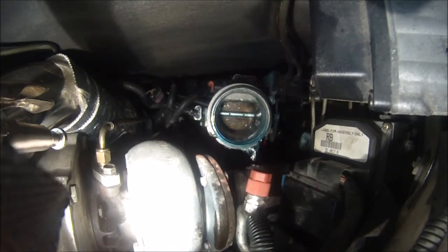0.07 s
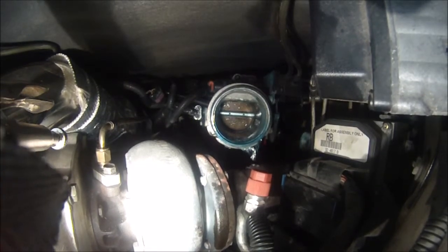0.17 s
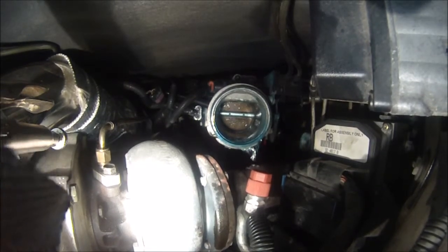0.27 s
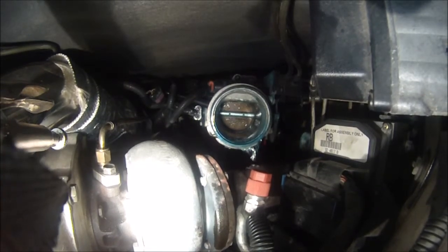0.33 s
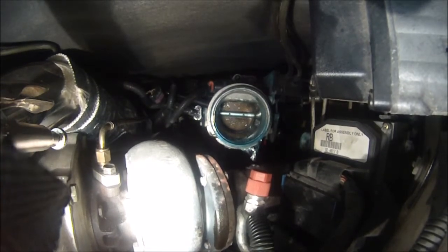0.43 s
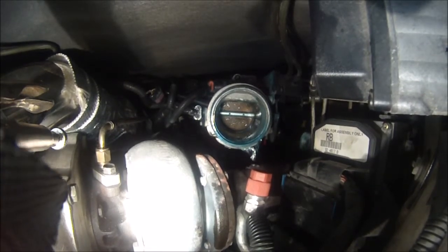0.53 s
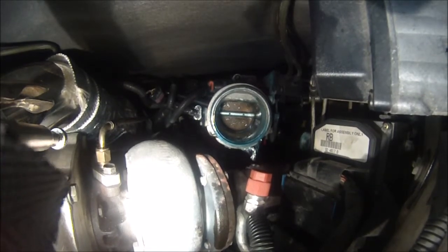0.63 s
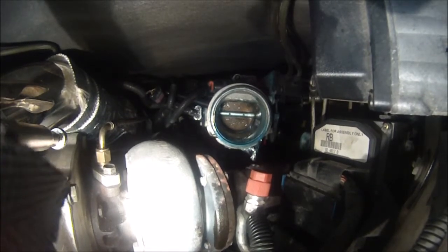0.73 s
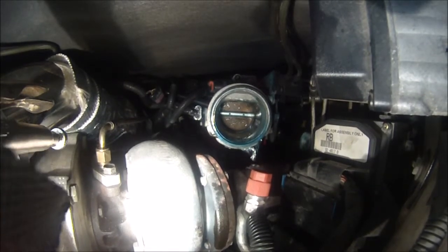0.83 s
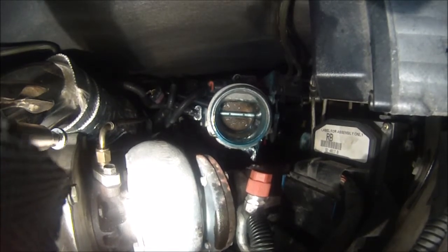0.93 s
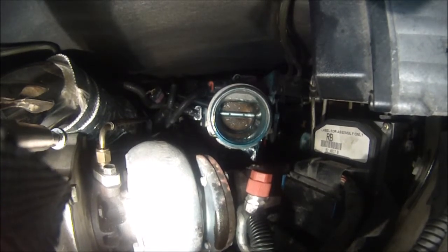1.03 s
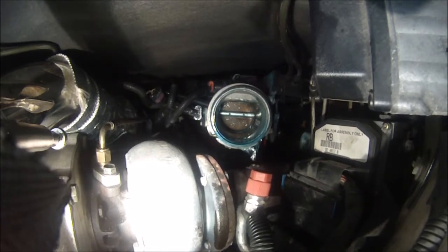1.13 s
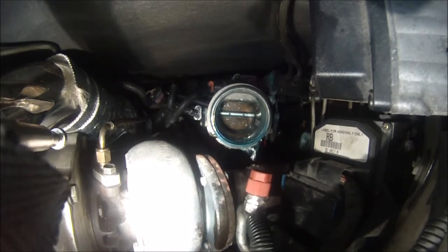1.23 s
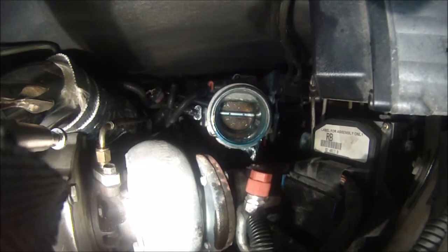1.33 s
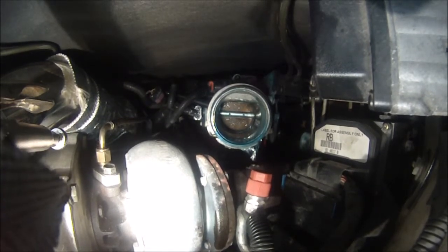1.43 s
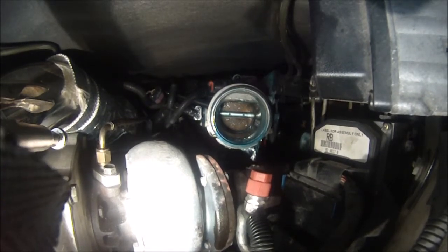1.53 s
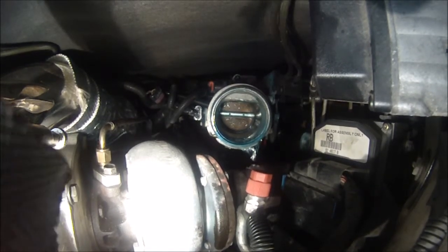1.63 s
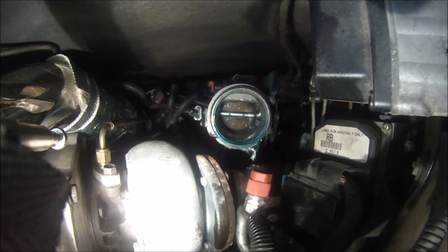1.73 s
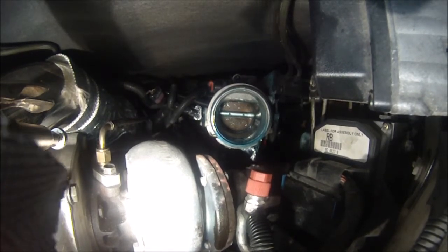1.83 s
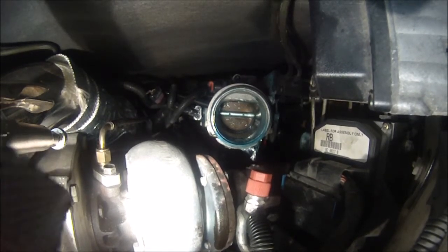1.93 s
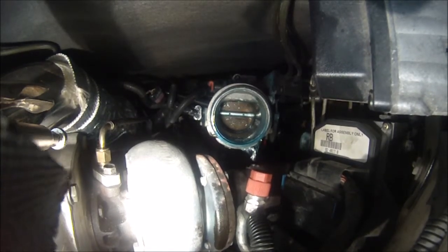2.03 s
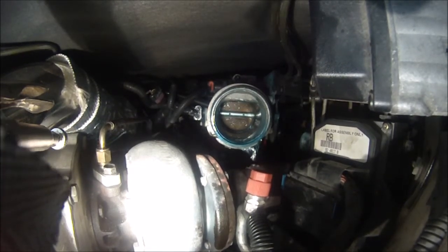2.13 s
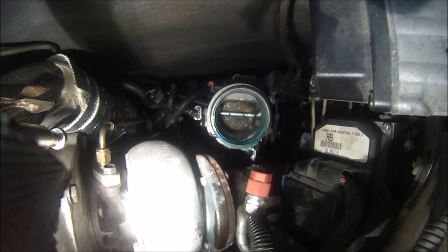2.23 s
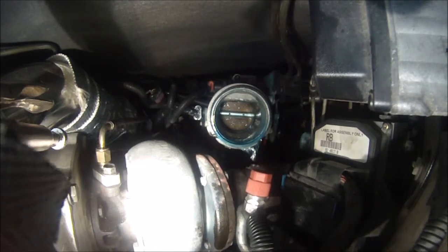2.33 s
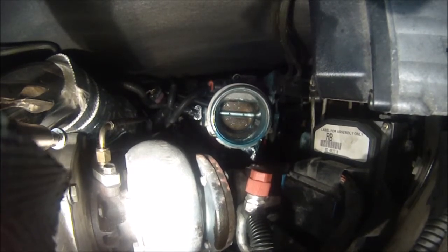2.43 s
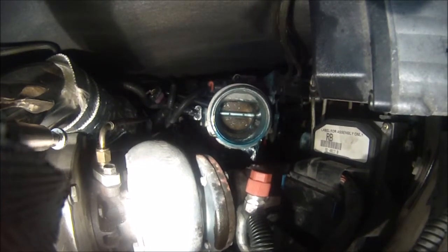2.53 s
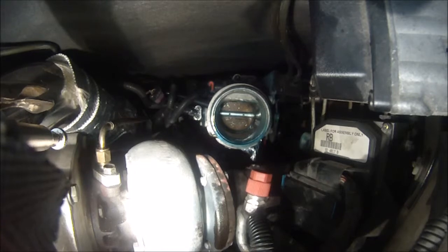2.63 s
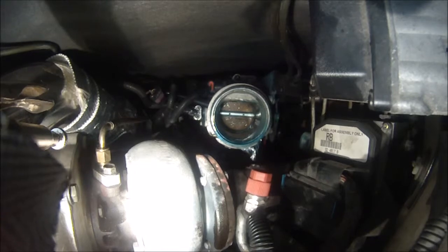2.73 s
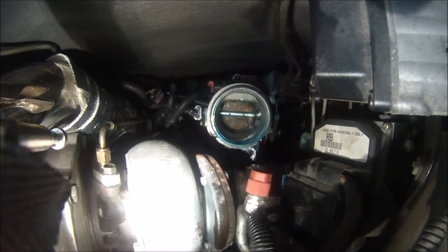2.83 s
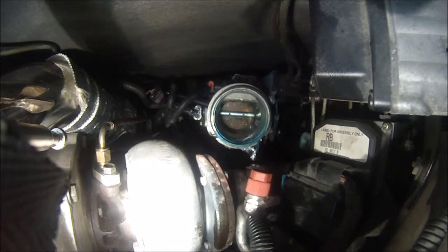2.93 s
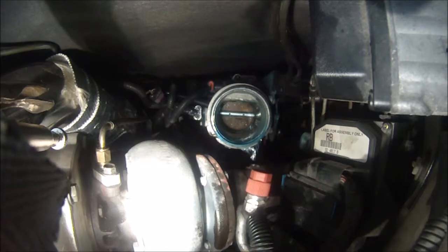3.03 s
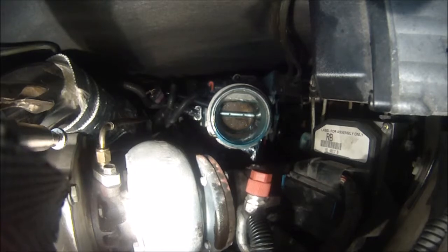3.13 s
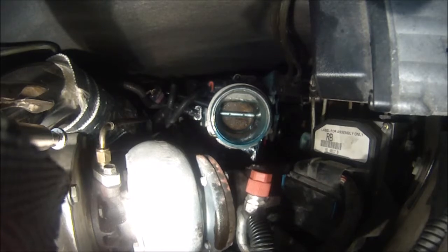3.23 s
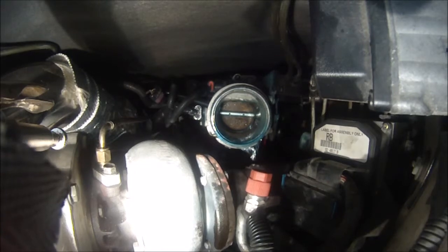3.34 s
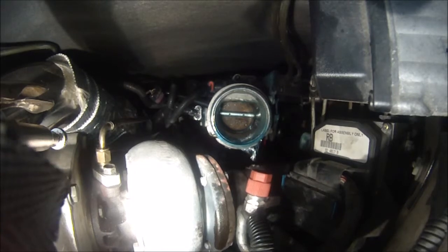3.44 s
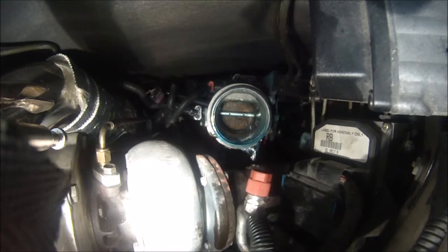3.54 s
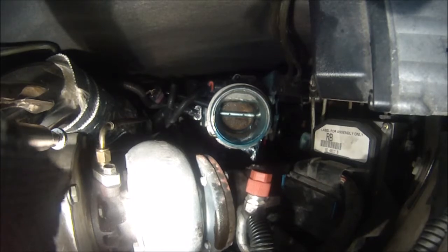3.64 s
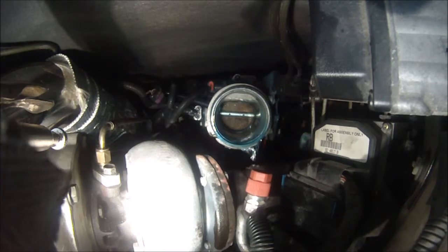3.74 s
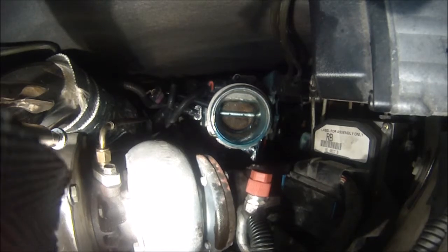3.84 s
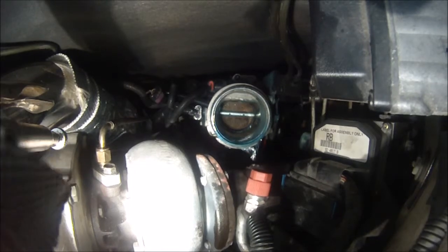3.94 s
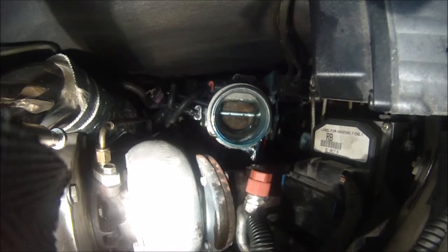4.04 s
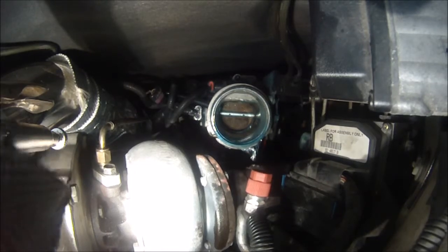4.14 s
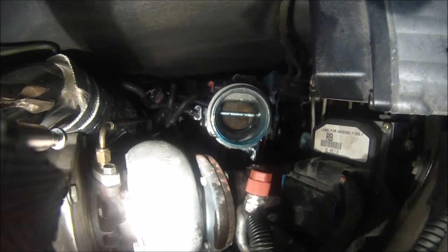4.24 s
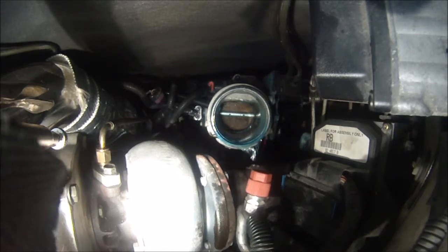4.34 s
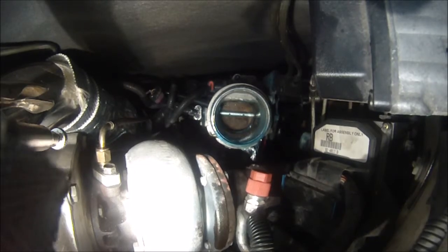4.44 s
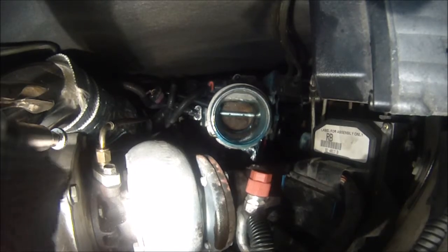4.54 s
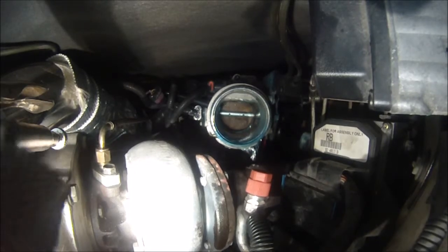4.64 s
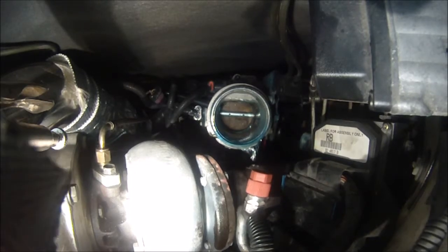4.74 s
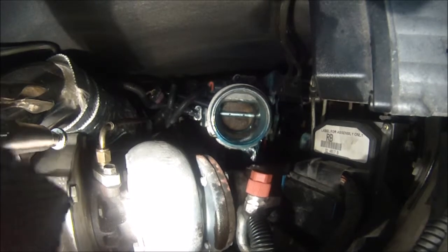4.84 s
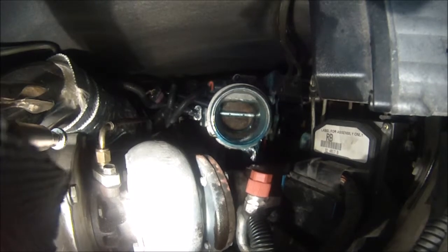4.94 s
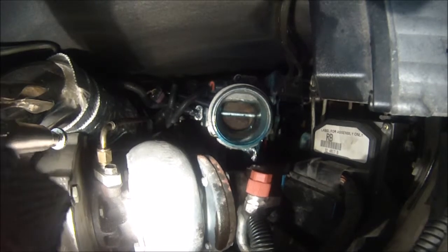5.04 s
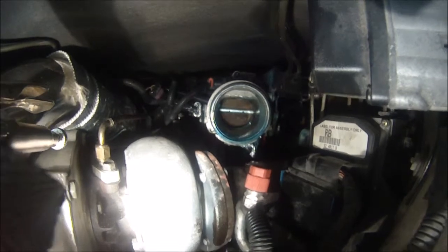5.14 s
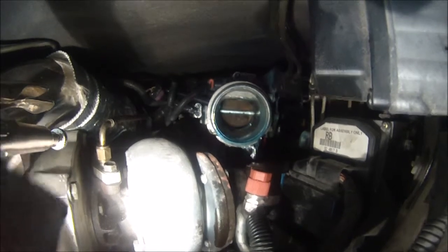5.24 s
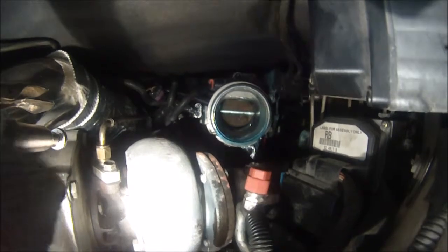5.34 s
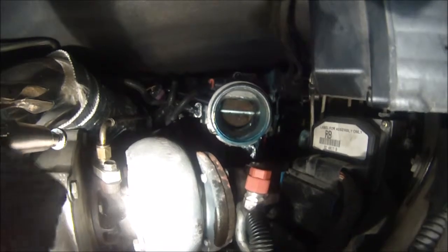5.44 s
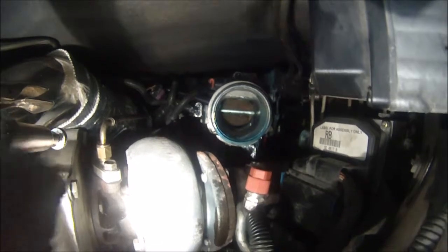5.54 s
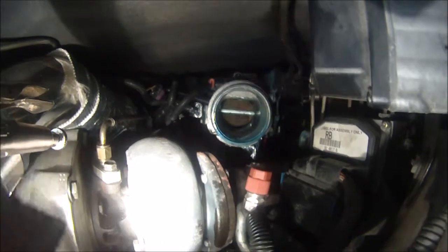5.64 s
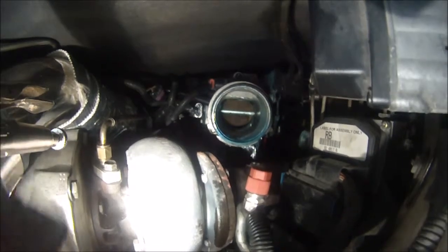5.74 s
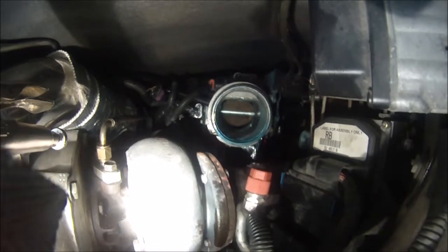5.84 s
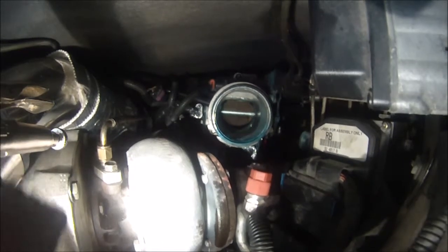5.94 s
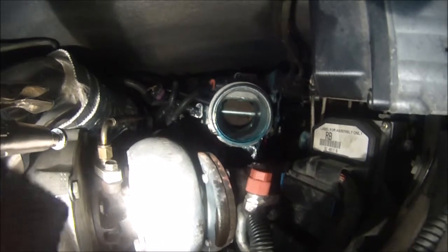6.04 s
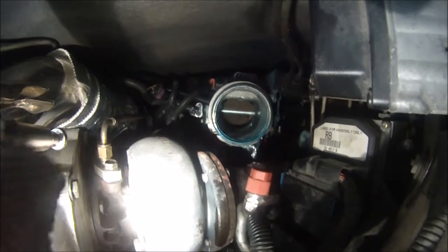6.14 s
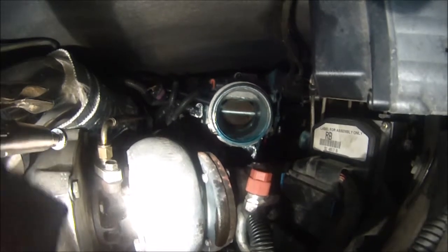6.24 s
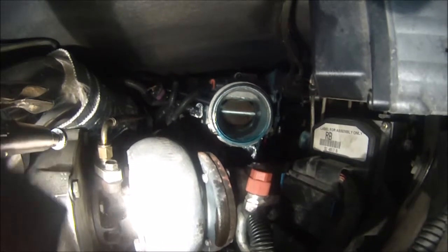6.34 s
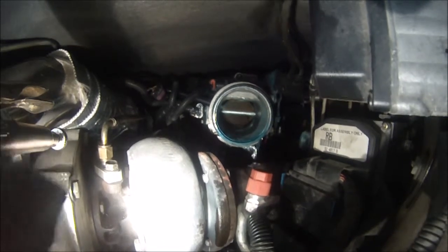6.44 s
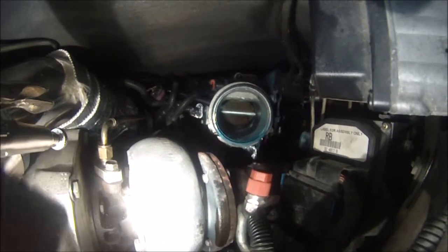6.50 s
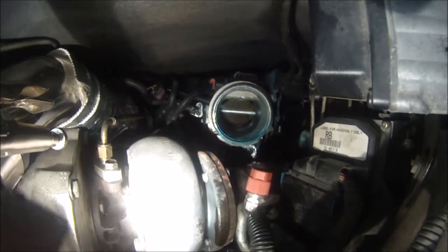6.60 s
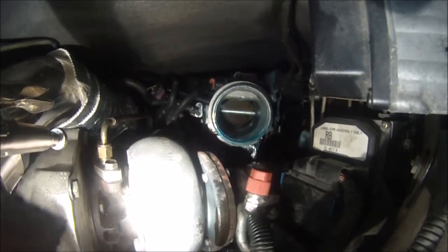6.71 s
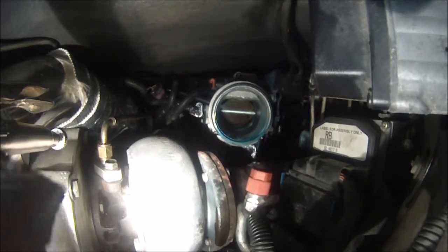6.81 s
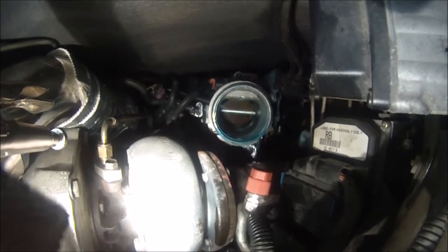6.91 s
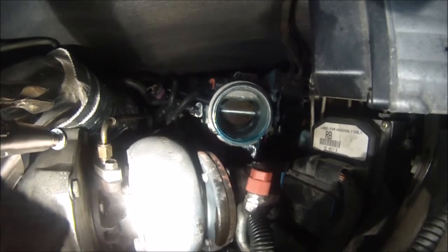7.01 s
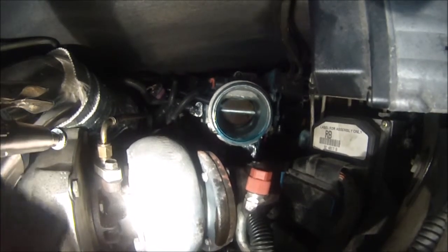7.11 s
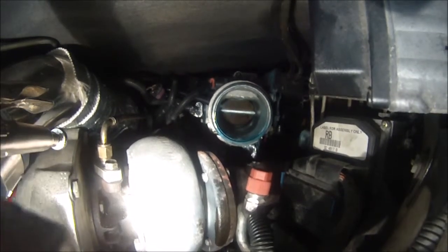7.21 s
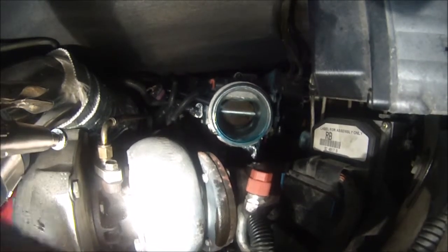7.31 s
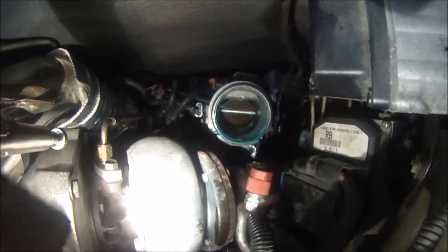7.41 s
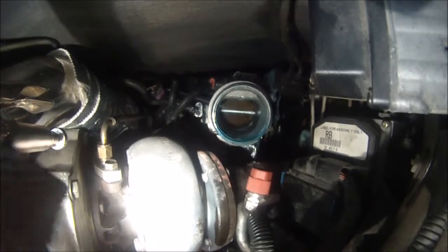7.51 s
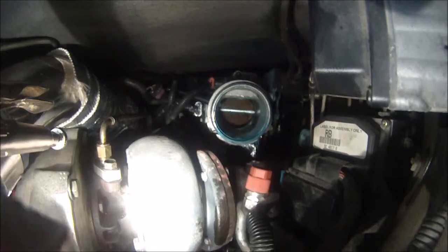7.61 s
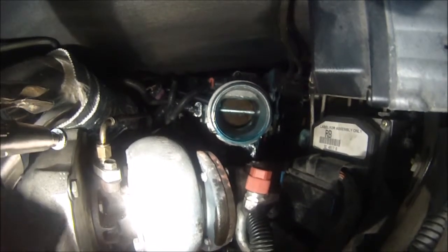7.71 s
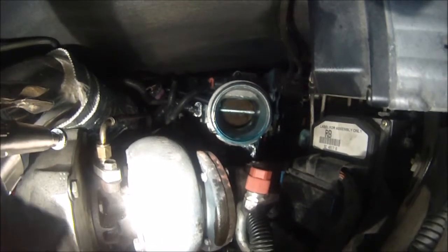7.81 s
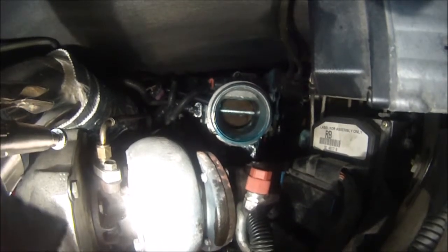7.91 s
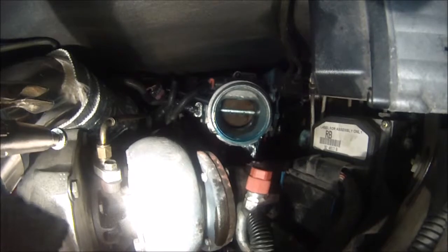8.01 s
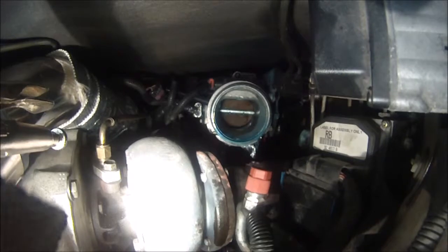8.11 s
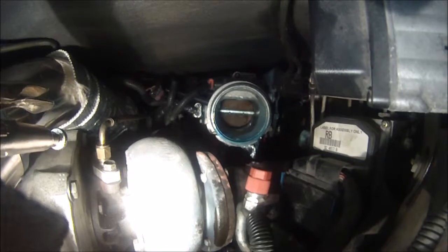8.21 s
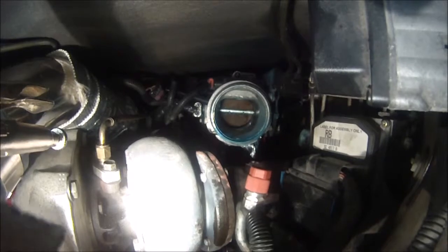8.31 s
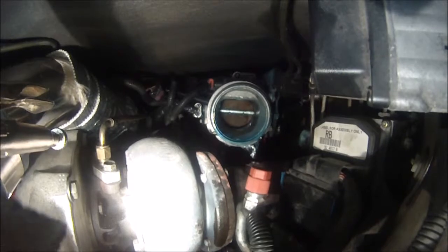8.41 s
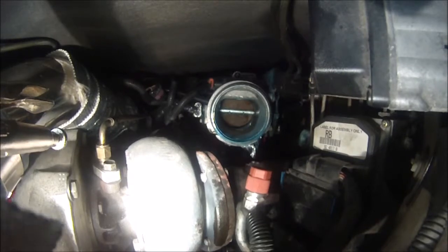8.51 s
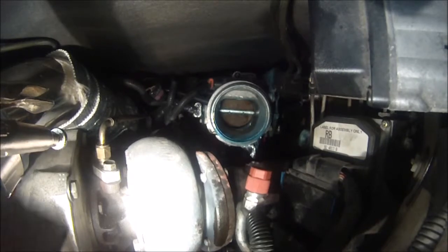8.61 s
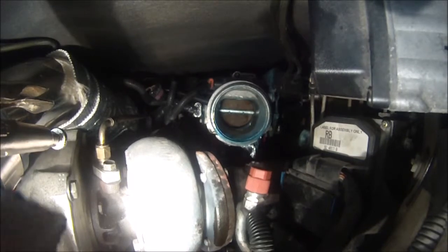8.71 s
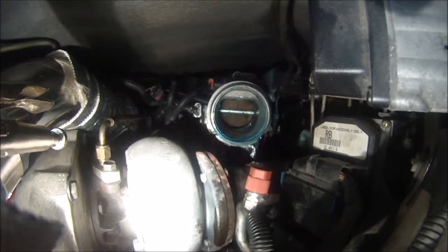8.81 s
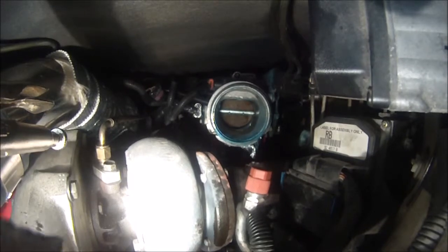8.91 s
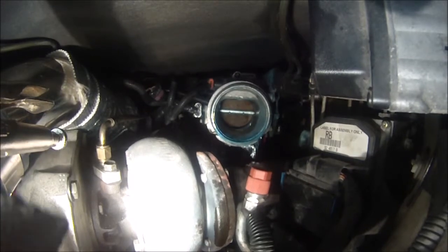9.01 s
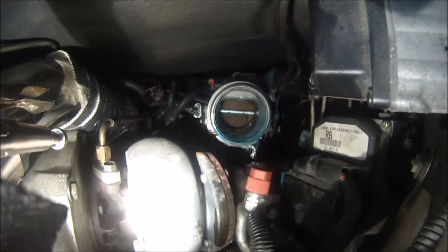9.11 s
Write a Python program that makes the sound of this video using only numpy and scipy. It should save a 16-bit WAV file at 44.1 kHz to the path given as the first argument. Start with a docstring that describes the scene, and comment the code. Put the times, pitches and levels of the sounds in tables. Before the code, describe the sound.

Close under a hood, a clattering idle jumps to a raspy rev, then an intake drone, roaring air and rising turbo whine peak and fall away.

```python
"""Turbocharged engine under the hood

The engine idles with a loose clatter, made of noise bursts at each firing, then revs up with a rasp of ringing metal.
Sine waves at multiples of the crank speed make the exhaust note and, under load, the drone of the intake.
Shaped noise makes the rush of air. The turbo, a sine whistle with sweeping bands of noise, spools up and runs down."""
import sys
import numpy as np
from scipy.fft import rfft, irfft, next_fast_len
from scipy.io import wavfile
from scipy.ndimage import map_coordinates

SR = 44100
rng = np.random.default_rng(int(sys.argv[2]) if len(sys.argv) > 2 else 0)


def waveform_to_disk(signal):
    """Save audio, clipped to [-1, 1], as 16-bit WAV at the path in sys.argv[1]."""
    frames = np.transpose(np.atleast_2d(signal))
    scaled = np.clip(frames, -1, 1) * 32767
    samples = np.round(scaled).astype(np.int16)
    wavfile.write(sys.argv[1], SR, samples)


N = 403942  # length in samples

TOP_ROTOR_HZ = 4500  # reference speed of the turbo rotor, in turns a second
BOOST_ATTACK_S = 0.33  # how long the drone and the air take to come in


def amp(db):
    """Turn decibels into a gain."""
    return 10 ** (np.asarray(db) / 20)


def unit(x):
    """Scale a sound to an average (rms) level of 1."""
    return x / np.sqrt(np.mean(x ** 2) + 1e-20)


def curves(rows):
    """Draw straight lines between the rows: one value per sample for each column after the time."""
    times, *columns = np.transpose(rows)
    return [np.interp(np.arange(N) / SR, times, column) for column in columns]


def along(points, hz):
    """Read a value off (frequency, value) points, on a logarithmic frequency axis."""
    frequencies, values = np.transpose(points)
    return np.interp(np.log(hz + 1), np.log(frequencies), values)


def wobble(rate):
    """A smooth random curve through `rate` random points a second."""
    points = rng.standard_normal(int(N * rate / SR) + 4)
    return map_coordinates(points, [np.arange(N) * rate / SR])


def noise():
    """White noise: a steady hiss with all pitches in it."""
    return rng.standard_normal(N)


def filtered(x, response):
    """Multiply each frequency in a sound by the gain that response(f) gives."""
    padded = next_fast_len(N + 8192)
    spectrum = rfft(x, padded) * response(np.fft.rfftfreq(padded, 1 / SR))
    return irfft(spectrum, padded)[:N]


def coloured(x, points):
    """Shape a sound with a spectrum of (f/Hz, level/dB) points."""
    return filtered(x, lambda hz: amp(along(points, hz)))


def ringing(x, modes):
    """Pass a sound through steep resonances (f/Hz, half-width/Hz, level/dB), to rms 1."""
    def resonance(f, centre, width):
        return 1j * f * width / (centre * centre - f * f + 1j * f * width)

    def response(f):
        # squaring makes the slopes steeper; the modes add up as powers
        power = sum(np.abs(amp(db) * resonance(f, centre, 2 * half) ** 2) ** 2 for centre, half, db in modes)
        return np.sqrt(power)

    return unit(filtered(x, response))


def puffs(turns, sharp, scatter_db):
    """Noise in loosely timed bursts, one per firing (two a turn), with sizes scattered at random."""
    firing = np.abs(2 * turns + 0.32 * wobble(50))
    sizes = amp(scatter_db * rng.standard_normal(int(firing.max()) + 1))
    pulse = np.exp(sharp * np.cos(2 * np.pi * firing))
    return unit(noise() * sizes[firing.astype(int)] * pulse)


def band(hz, width_hz):
    """Narrow noise of rms 1 around a moving pitch: two slow random curves carried by cosine and sine."""
    angle = 2 * np.pi * np.cumsum(hz) / SR

    def swirl():
        return unit(filtered(noise(), lambda f: 1 / (1 + (f / width_hz) ** 2)))

    return swirl() * np.cos(angle) + swirl() * np.sin(angle)


def swells(events, attack, t60):
    """An envelope that rises and dies for each (t/s, level/dB) row; t60 is the time to fall by 60 dB."""
    t = np.arange(SR // 4) / SR
    envelope = np.zeros(N + SR)
    for start, db in events:
        envelope[round(start * SR):][:len(t)] += amp(db - 60 * t / t60) * (1 - np.exp(-t / attack))
    return envelope[:N]


def boost(attack_s):
    """Rise smoothly from 0 to 1 as the turbo starts to draw air, 5 s into the sound."""
    progress = np.clip((np.arange(N) / SR - 5) / attack_s, 0, 1)
    return np.sin(np.pi / 2 * progress) ** 2


def machinery(turns):
    """Belts and shafts churn over a rumble; the valve gear clatters and rings faintly, with harder knocks at idle."""
    # belts, shafts and block: t/s, churn level/dB, rumble level/dB
    churn_levels = [(0, -34.5, -50), (3.5, -33.5, -50), (4.1, -37.5, -56), (5.5, -37.5, -54),
                    (6.15, -28.5, -43), (7.3, -40, -47), (8.2, -29, -46.5), (9.16, -31, -44)]
    # tone of the churn in the engine bay: f/Hz, level/dB
    bay_colour = [(30, -47), (70, -22), (130, -14), (230, -2.5), (330, 2), (430, -1), (650, -4.5),
                  (930, -11.5), (1130, -7.5), (1350, -10), (1480, -17.5), (2100, -26), (3000, -40),
                  (16000, -58)]
    # tone of the valve gear: f/Hz, level/dB
    clatter_colour = [(500, -8.5), (1100, 9), (1450, 0.5), (1680, 8), (1930, 0.5), (2100, 5.5), (2550, -5),
                      (3000, -16), (3700, -30), (4700, -40), (5800, -34), (7300, -22.5), (10000, -37),
                      (15000, -67)]
    # faint ring of the cover: f/Hz, half-width/Hz, level/dB
    ring_modes = [(4660, 110, 0)]
    # loose knocks at idle: t/s, level/dB (before attack and tone shaping)
    knock_events = [(0.7701, -34), (1.0177, -32.5), (1.0896, -30), (1.331, -33), (1.5926, -27),
                    (1.8, -31.5), (1.9654, -29), (2.157, -28.5), (2.6224, -28), (2.6623, -32),
                    (2.8115, -31.5)]
    # tone of the knocks: f/Hz, level/dB
    knock_colour = [(500, -6), (1100, 10.5), (1450, 1), (1680, 6), (2100, 8), (2550, -4.5), (3000, -12),
                    (3800, -19.5), (4700, -27), (5800, -33), (7300, -27), (10000, -40), (15000, -67)]
    churn_db, rumble_db = curves(churn_levels)
    churn = unit(coloured(puffs(turns, sharp=0.13, scatter_db=1.1), bay_colour)) * amp(churn_db)
    rumble_colour = [(20, -31), (55, -14), (90, -4.5), (150, 2.5), (300, 3), (900, -56)]  # f/Hz, level/dB
    rumble = unit(coloured(noise(), rumble_colour)) * amp(rumble_db)
    clatter = unit(coloured(puffs(turns, sharp=0.16, scatter_db=2.5), clatter_colour))
    clatter *= amp(-43.5 + 0.28 * wobble(14))
    ring = ringing(noise(), ring_modes) * amp(-78.5)
    rattles = noise() * swells(knock_events, attack=.002, t60=.12)
    knocks = coloured(rattles, knock_colour) * amp(3.0)
    return churn + rumble + clatter + ring + knocks


def exhaust(turns, speed):
    """Sine waves at multiples (orders) of the crank speed swell with effort and boom at the body's resonance."""
    # how hard the engine works: t/s, effort (share from 0 to 1)
    effort_curve = [(3.1, 0.4), (3.9, .27), (4.15, 0.66), (4.8, .93), (5.2, 0.61), (9.16, 0.86)]
    # exhaust orders: multiple of crank speed, level at effort 0/dB, level at effort 1/dB
    order_levels = [(2, -66, -54.5), (3, -73.5, -48.5), (4, -72, -37), (5, -65, -40.5), (16, -95, -39),
                    (19, -95, -42)]
    effort, = curves(effort_curve)
    boom_hz, boom_width_hz, boom_db = 100, 13, 9.5  # body resonance; its gain at effort 1
    total = np.zeros(N)
    for order, idle_db, full_db in order_levels:
        nearness = np.exp(-((order * speed - boom_hz) / boom_width_hz) ** 2)
        level_db = idle_db + effort * (full_db - idle_db) + boom_db * effort * nearness
        unsteady = amp(1.2 * wobble(12))
        total += amp(level_db) * unsteady * np.sin(2 * np.pi * (round(order) * turns + rng.random()))
    return np.sqrt(2) * total  # makes the levels rms levels


def rasp(turns):
    """With the throttle open each firing rings the cover and airbox; the valves sizzle and tick."""
    # open throttle: t/s, cover level/dB, airbox level/dB, valve sizzle level/dB
    rasp_levels = [(2.8, -67, -72, -86), (3.08, -44, -44, -61), (3.4, -37, -40.5, -56),
                   (3.85, -35.5, -34, -53), (4.35, -36, -34.5, -54.5), (4.75, -34, -37.5, -59.5),
                   (5.1, -33.5, -38, -54), (5.35, -38, -39.5, -46.5), (9.16, -39, -38.5, -58)]
    # resonances of the cover: f/Hz, half-width/Hz, level/dB
    cover_modes = [(1117, 37, -2), (1250, 120, -14), (1670, 100, -3), (1990, 153, 4.5), (2170, 85, 2),
                   (2280, 86, -13), (3050, 66, -13), (3355, 61, -15), (3920, 70, -25), (4660, 190, -17.5),
                   (5100, 80, -21), (5470, 70, -21), (6630, 220, -22.5), (8550, 130, -42),
                   (10450, 180, -40), (12080, 160, -41), (14250, 220, -43)]
    # resonance of the airbox: f/Hz, half-width/Hz, level/dB
    airbox_modes = [(735, 78, 0)]
    # the airbox gulps: t/s, level/dB (before the attack)
    gulp_events = [(4.975, -21)]
    # tone of the valve sizzle: f/Hz, level/dB
    sizzle_colour = [(2500, 2), (3800, -4), (5300, -1.5), (6000, 0), (6900, 6), (8500, 4), (9800, -4),
                     (11000, -2), (13200, -5.5), (15000, -7)]
    # sharp ticks as it revs: t/s, level/dB (before attack and tone shaping)
    tick_events = [(3.2146, -45), (3.3238, -44), (3.4221, -38), (3.5079, -41), (3.5892, -46), (3.9734, -44),
                   (4.0427, -43), (4.1086, -41), (4.1674, -47), (4.2238, -44), (4.2772, -44), (5.2021, -43),
                   (5.249, -39), (5.3328, -39)]
    # tone of the ticks: f/Hz, level/dB
    tick_colour = [(2500, 0), (4200, 4), (5500, 2), (6900, 7), (9500, -4), (11300, 2), (13000, -7),
                   (15000, -13)]
    # a small metal part pings: t/s, level/dB (before attack and tone shaping)
    ping_events = [(3.19, -42.5)]
    cover_db, airbox_db, sizzle_db = curves(rasp_levels)
    cover = ringing(puffs(turns, sharp=0.12, scatter_db=1.0), cover_modes)
    cover *= amp(cover_db + 0.46 * wobble(9))
    suction = amp(airbox_db + 1.1 * wobble(9.9)) + swells(gulp_events, attack=.02, t60=0.2)
    airbox = suction * ringing(puffs(turns, sharp=0.39, scatter_db=0.0), airbox_modes)
    sizzle = unit(coloured(puffs(turns, sharp=0.14, scatter_db=2.0), sizzle_colour))
    sizzle *= amp(sizzle_db + 0.53 * wobble(12))
    tick_bursts = noise() * swells(tick_events, attack=0.0016, t60=0.034)
    ticks = coloured(tick_bursts, tick_colour) * amp(2.5)
    ping_colour = [(9000, -40), (10700, -8), (10950, 21), (11250, -8), (13000, -40)]  # f/Hz, level/dB
    ping = coloured(noise() * swells(ping_events, attack=.012, t60=0.16), ping_colour)
    return cover + airbox + sizzle + ticks + ping


def drone(turns, speed):
    """Under boost the intake sings on the eighth order; overtones flare as they cross the tract's resonances."""
    # partials of the drone: crank order, level/dB
    partials = [(8, 0), (12, -3.5), (16, -3.5)]
    # what the intake tract lets through: f/Hz, level/dB
    tract_response = [(480, -1), (550, -1), (580, 1.5), (650, -3), (740, -5), (780, -12), (820, -7),
                      (860, -15), (960, -25), (1010, -10), (1050, -5.5), (1100, -0.5), (1135, -16),
                      (1300, -25)]
    t = np.arange(N) / SR
    # rises by 23.5 dB a second, holds at -19 dB, then falls by 21 dB a second
    swell_db = -19 - 23.5 * np.maximum(6.127 - t, 0) - 21 * np.maximum(t - 7.32, 0)
    song = np.zeros(N)
    for order, db in partials:
        level_db = db + along(tract_response, order * speed) + 0.75 * wobble(25)
        song += amp(level_db) * np.sin(2 * np.pi * round(order) * turns)
    return np.sqrt(2) * boost(BOOST_ATTACK_S) * amp(swell_db) * song


def air(rotor_hz):
    """Air roars and hisses in, louder and brighter with rotor speed; the charge pipe sings at a set level."""
    # tone of the roar: f/Hz, level/dB
    roar_colour = [(20, -65), (40, -35), (100, -19.5), (200, -6), (280, -1), (400, 0), (520, 0),
                   (650, -4.5), (770, 0), (880, -5.5), (1090, 0), (1300, -3.5), (1500, -7), (1700, -4.5),
                   (1900, -4), (2170, -2.5), (2350, -5), (2520, -13.5), (3250, -25.5), (5500, -120)]
    # tone of the hiss: f/Hz, level/dB
    hiss_colour = [(1500, -35), (2300, 9.5), (2600, 6.5), (2900, 5), (3400, 1.5), (4200, 1.5), (5300, 1),
                   (5800, -1), (6150, -2.5), (6500, 0.5), (7200, 4), (8200, 0), (9600, -6), (11000, -5.5),
                   (11900, -13), (13200, -11), (14400, -12), (15400, -17)]
    # resonances of the charge pipe: f/Hz, half-width/Hz, level/dB
    pipe_modes = [(2840, 190, -2.5), (7560, 200, -3)]
    octaves = np.log2(rotor_hz / TOP_ROTOR_HZ)  # rotor speed, in doublings from the reference
    eddies = amp(0.72 * wobble(30))
    # level at the reference speed in dB, plus dB per doubling of speed
    roar = unit(coloured(noise(), roar_colour)) * amp(-14.5 + 17 * octaves)
    hiss = unit(coloured(noise(), hiss_colour)) * amp(-25 + 19.5 * octaves)
    pipe = ringing(noise(), pipe_modes) * amp(-43.5)
    return boost(BOOST_ATTACK_S) * eddies * (roar + hiss) + boost(1) * pipe


def turbo(rotor_hz):
    """The rotor whistles; its blades shed noise near one and two octaves up that sweeps the duct's resonances."""
    # the housing favours some pitches: f/Hz, whistle level/dB
    whistle_levels = [(1400, -77), (2250, -62), (2600, -47.5), (2930, -35.5), (3200, -41.5), (3600, -44.5),
                      (3800, -41), (3980, -31.5), (4230, -34), (4480, -31)]
    # resonances of the duct: f/Hz, level/dB
    duct_response = [(2000, 10), (2700, 10.5), (3500, 7), (4400, 7), (5600, 6), (6200, -5.5), (6750, 0),
                     (6950, 11.5), (7200, 5), (7600, 5.5), (8300, -0.5), (9200, -4.5), (10500, -18),
                     (12500, -10), (13200, 2), (13700, -1), (14300, 1), (15000, -14)]
    spin = rotor_hz / TOP_ROTOR_HZ
    angle = 2 * np.pi * np.cumsum(rotor_hz * (1 + .0006 * wobble(45))) / SR
    tone = (np.sin(angle) + amp(-11) * np.sin(2 * angle)) * amp(1.2 * wobble(35))
    whistle = np.sqrt(2) * amp(along(whistle_levels, rotor_hz)) * tone
    # the howl's ratio to the rotor pitch grows a little with speed
    howl_hz = 2.005 * rotor_hz * spin ** .2
    howl_db = -30.5 + 16.5 * np.log2(spin)
    # the faster the flow, the more the howl blurs into hiss
    blur = np.interp(howl_hz, [2700, 5000, 7500, 9000], [.05, .5, .68, .88])
    howl = np.sqrt(1 - blur) * band(howl_hz, width_hz=170)
    howl += np.sqrt(blur) * band(howl_hz, width_hz=650)
    overtone = band(4 * rotor_hz, width_hz=500) * amp(-14)
    shed = coloured((howl + overtone) * amp(howl_db + .6 * wobble(25)), duct_response)
    return boost(.42) ** 2 * (whistle + shed)


def hood(x):
    """Close metal surfaces reflect the treble; the short echoes ripple its spectrum."""
    # echoes off the hood and nearby parts: delay/s, gain (negative flips the wave)
    reflections = [(.0007, 0.03), (.000803, -0.061), (.000985, 0.041), (.00172, .08), (.00231, 0.067)]

    def response(f):
        echoes = sum(gain * np.exp(-2j * np.pi * f * delay) for delay, gain in reflections)
        return 1 + echoes * np.clip(f / 1500 - 1, 0, 1)  # none below 1500 Hz, all from 3000 Hz

    return filtered(x, response)


def scene():
    """A slightly wavering crankshaft times the engine, the rotor drives air and whistle; one microphone hears all."""
    # crankshaft: t/s, speed/(turns per second) before the waver
    crank_curve = [(0, 24), (3.05, 24), (3.3, 28), (3.5, 33.5), (3.95, 41), (4.35, 60), (4.5, 64.8),
                   (4.75, 67.3), (5.15, 62.3), (5.38, 62.8), (5.53, 61.1), (5.88, 62.8), (6.06, 65.9),
                   (6.17, 65.6), (6.3, 68), (7.3, 78.4), (7.9, 82), (9.16, 80)]
    # turbo rotor, whose turns per second are the whistle's pitch: t/s, f/Hz
    rotor_curve = [(5.1, 1400), (5.4, 1650), (5.8, 2380), (5.97, 2600), (6.08, 2930), (6.33, 3560),
                   (6.62, 4034), (6.85, 4270), (7.1, 4450), (7.3, 4498), (7.42, 4463), (7.52, 4355),
                   (7.75, 3930), (8.05, 3540), (8.25, 3178), (8.47, 2916), (8.82, 2660), (9.16, 2540)]
    speed, = curves(crank_curve)
    rotor_hz, = curves(rotor_curve)
    turns = np.cumsum(speed * (1 + .004 * wobble(14))) / SR  # turns made so far
    engine = machinery(turns) + exhaust(turns, speed) + rasp(turns)
    intake = drone(turns, speed) + air(rotor_hz) + turbo(rotor_hz)
    bay = hood(engine + intake)
    return np.array([bay, bay])  # both channels alike


def record(dry):
    """The recorder rounds off the highest peaks and keeps nothing above its band limit."""
    top_hz = 15350
    rounded = dry / (1 + np.abs(dry / .6) ** 8) ** (1 / 8)  # peaks level off towards 0.6
    return np.array([filtered(x, lambda hz: hz < top_hz) for x in rounded])


dry = scene()
out = record(dry)
waveform_to_disk(out)
```